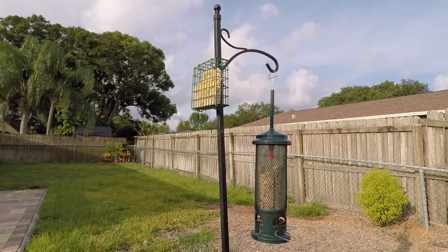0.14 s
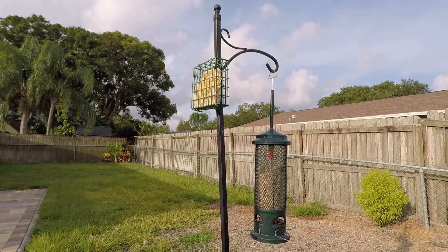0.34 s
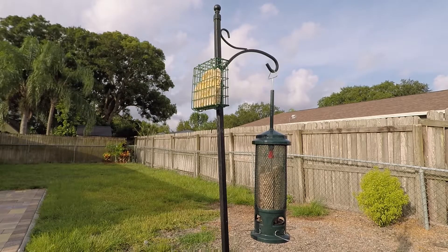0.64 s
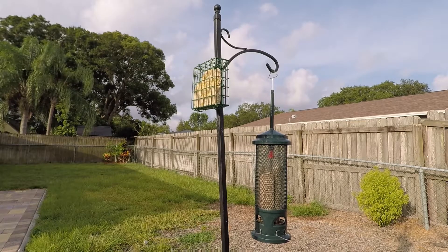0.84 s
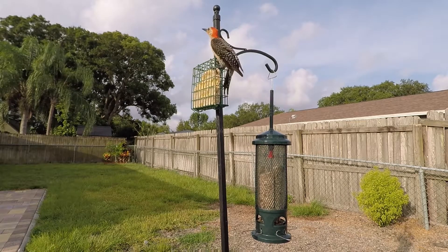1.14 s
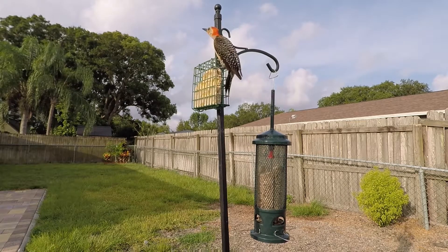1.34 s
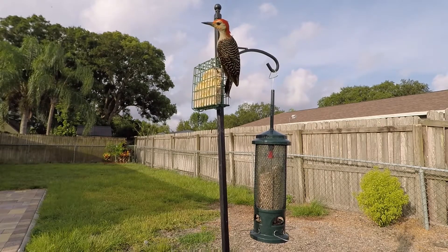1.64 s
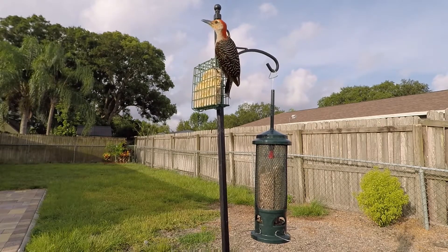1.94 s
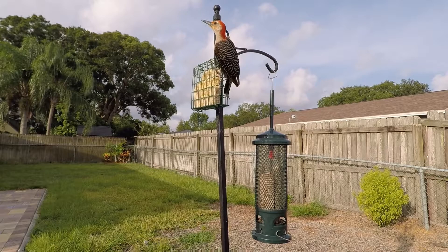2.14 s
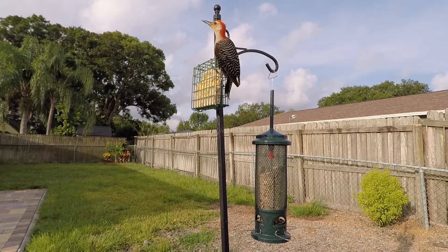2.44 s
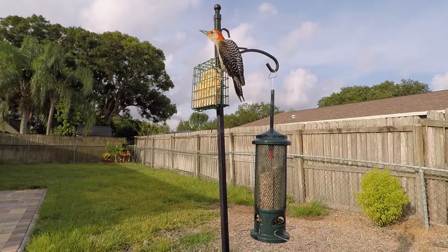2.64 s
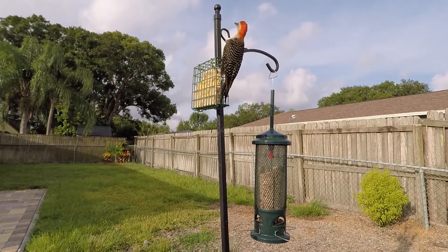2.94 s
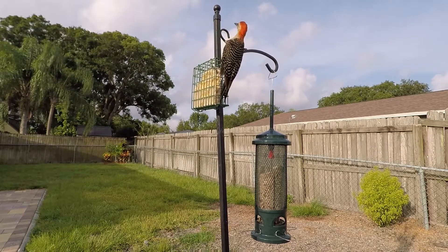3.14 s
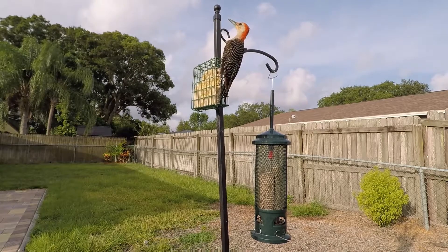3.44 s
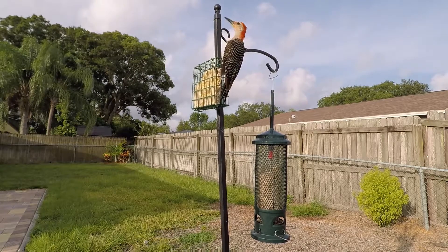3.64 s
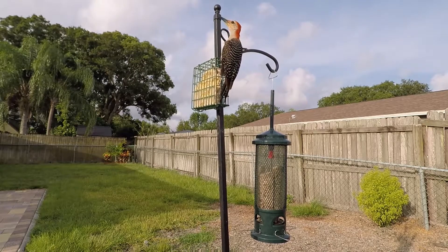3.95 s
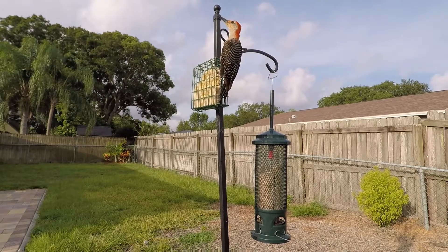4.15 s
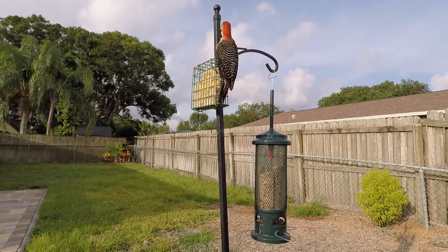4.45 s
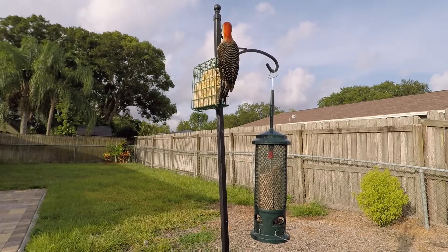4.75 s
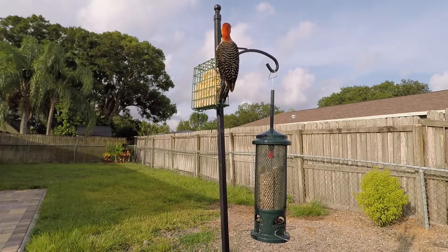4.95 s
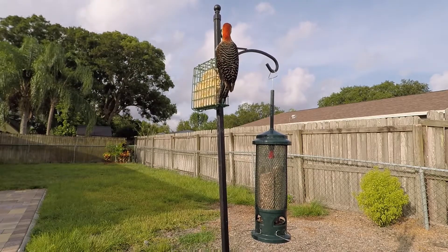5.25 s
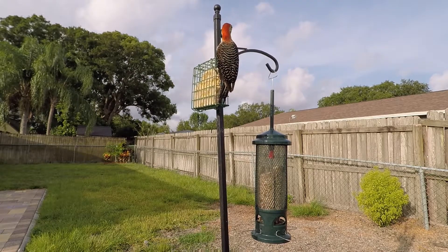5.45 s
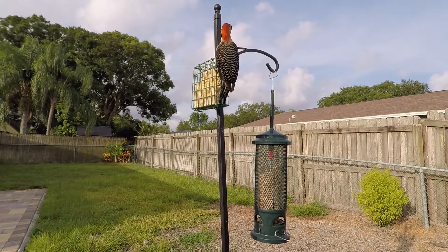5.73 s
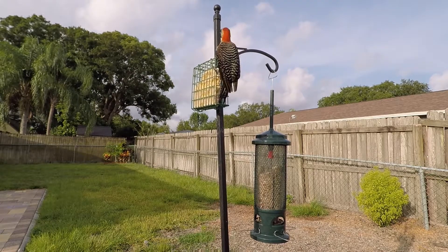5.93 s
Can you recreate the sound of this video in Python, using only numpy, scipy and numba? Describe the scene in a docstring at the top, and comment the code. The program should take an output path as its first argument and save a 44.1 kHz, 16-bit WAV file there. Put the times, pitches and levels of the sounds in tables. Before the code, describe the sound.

A woodpecker flies in with two faint notes and a soft flutter of wings, then lands on an iron feeder pole with a quick, dull knock. It gives five short, harsh calls, pauses, and gives six more, each with a creaky tail and a slight echo off the yard fences. Light wind on the microphone, distant traffic and a soft, steady low thumping lie underneath.

```python
"""A fenced back yard, one camera microphone. A brief low bump, then light wind, distant traffic, a low
drone, a thin pulsing whine and a soft, clock-steady thump from the camera itself. A woodpecker flies in
with two notes on the wing and lands on an iron feeder pole at 0.9 s. It calls five times, a far songbird
chirps, then it calls six times more. Each note is a harsh voiced head and a creaky tail, both made of
syrinx puffs ringing resonances; the fences and the yard echo them."""
import sys
import numpy as np
from scipy import signal
from scipy.io import wavfile
from scipy.ndimage import uniform_filter1d
from numba import njit

SR = 44100
rng = np.random.default_rng(int(sys.argv[2]) if len(sys.argv) > 2 else 0)


def materialize(psi):
    """Save the field psi as 16-bit PCM at rate SR to the path in sys.argv[1].

    A 1-D psi becomes a single channel; in a 2-D psi each row is a channel.
    """
    bounded = np.clip(np.atleast_2d(psi).T, -1, 1)
    quanta = np.round(bounded * 32767).astype(np.int16)
    wavfile.write(sys.argv[1], SR, quanta)


N = 268480

# distant traffic: (frequency [Hz], relative density [dB per Hz])
TRAFFIC_SPECTRUM = [(53, -29), (90, -1), (242, -15), (288, -12.5), (406, -15.5), (515, -19.5), (599, -11.5),
                    (827, -15), (1240, -29), (5990, -35), (7430, -43.5), (8640, -42.5), (15500, -45.5)]
# a brief low bump at the very start, then light wind on the microphone: (time [s], level [dB])
BUMP_AND_WIND = [(0.0, -29.5), (0.08, -45), (0.2, -40), (0.41, -47), (0.46, -43), (0.95, -47.5),
                 (1.76, -46), (2.39, -53), (2.49, -44), (2.74, -54), (2.78, -44), (3.23, -51.5),
                 (3.42, -38.5), (3.5, -52.5), (4.89, -48), (4.93, -49.5), (6.06, -52.5), (6.08, -54)]
# far songbird: (time [s], pitch [Hz], level [dB])
SONGBIRD_CHIRP = [(3.108, 7150, -84), (3.118, 7140, -73), (3.135, 6440, -76), (3.148, 6200, -88)]
# feather rustles: (time [s], level [dB], decay time [s])
WINGBEATS = [(0.717, -61, 0.017), (0.84, -67.5, 0.028), (0.897, -71.5, 0.052), (0.966, -73, .02),
             (1.016, -72, 0.036), (1.072, -69, 0.014), (3.898, -68, 0.0079), (5.427, -66, 0.021)]
# feet on the pole: (time [s], level [dB])
FOOT_KNOCKS = [(.848, -48), (0.908, -35), (0.913, -34), (0.921, -39.5), (.929, -39), (.952, -51)]
# modes of the iron pole: (frequency [Hz], level [dB], time to fall 60 dB [s])
POLE_MODES = [(48, 0.5, 0.077), (313, -4, 0.019), (480, 2, 0.015), (660, -2, 0.021), (865, -14, 0.021)]
# echoes off the fences: (delay [s], level [dB])
FENCE_ECHOES = [(0.043, -20.5), (.118, -28)]
# woodpecker notes: (time [s], level [dB], pitch [Hz], hoarseness [0-1], beat depth [0-1],
# beat period [cycles], throat start [Hz], throat end [Hz], upper resonance [Hz], treble [dB], head [s])
NOTES = [(0.326, -51.5, 1466, .9, 0.8, 2, 4330, 4050, 5900, -8, 0.029),
         (.507, -44, 1536, 0.7, 0.1, 3, 4140, 3820, 6020, -7.5, 0.037),
         (1.402, -38, 1480, 0.56, 0.46, 4, 3950, 3640, 7100, -20.5, 0.035),
         (1.708, -36.5, 1538, 0.63, 0.8, 4, 4160, 2890, 7650, -16.5, 0.033),
         (1.981, -37.5, 1581, 0.7, 0.4, 3, 3870, 2670, 7360, -16, 0.038),
         (2.250, -38, 1613, 0.83, 1, 4, 3470, 2830, 7050, -19, 0.044),
         (2.564, -36.5, 1581, 0.83, 0.73, 4, 3460, 2780, 7640, -15.5, 0.037),
         (4.299, -36, 1702, 0.22, 0.78, 3, 4000, 2700, 6520, -12.5, 0.042),
         (4.61, -37.5, 1654, 0.74, 0.55, 3, 3900, 2570, 7370, -12.5, 0.0439),
         (4.896, -37, 1677, 0.74, 0.4, 4, 3400, 2600, 7500, -12, 0.043),
         (5.192, -37.5, 1672, 0.56, 0.58, 3, 3520, 2440, 7300, -12.5, 0.044),
         (5.502, -37.5, 1703, 0.5, 0.6, 3, 3400, 2570, 6960, -12.5, 0.043),
         (5.828, -37, 1701, 0.55, 0.5, 3, 3670, 2630, 7000, -12, .042)]
# envelope of the voiced head: (time [head lengths], level [dB])
HEAD_SWELL = [(0, -25.5), (.12, -9.5), (.3, -5.5), (.45, -2), (.65, 0), (.85, -3.5), (.95, -8),
              (1.15, -12.5), (1.4, -42)]
# envelope of the creaky tail: (time [creak lengths], level [dB])
CREAK_SWELL = [(.15, -33), (.3, 0.5), (.45, -2.5), (.65, 0), (.9, -4), (1.1, -22)]
# resonances of the bill, the head's top treble, the creak's body and its bright edge:
# (centre [Hz], width [Hz], level [dB])
BILL_BANDS = [(952, 320, -12.5), (2610, 680, -3), (5200, 1960, -12)]
SHEEN_BANDS = [(10530, 1900, -5), (12860, 2000, -14), (11850, 5700, -4.5)]
CREAK_BANDS = [(825, 180, 0.5), (1600, 780, -2.5), (2184, 390, 0)]
EDGE_BANDS = [(4080, 340, -57), (6200, 8000, -19)]

WHISTLE_DB, WHISTLE_AT_HZ, WHISTLE_DB_PER_OCTAVE = -4, 1586, 15  # higher notes whistle more
SHEEN_DB = -10.5  # against the upper resonance
CREAK_DB, CREAK_HEADS = -12.5, 3.2  # against the note's level; length in head lengths


def undb(db):
    """Decibels to gain."""
    return 10 ** (np.asarray(db) / 20)


def level(x, db):
    """Scale to an rms level."""
    return x * undb(db) / np.sqrt(np.mean(x ** 2))


def add(into, x, s):
    """Mix x in from time s."""
    i = int(s * SR)
    into[i:i + len(x)] += x[:len(into) - i]


@njit
def svf(x, g, k):
    """State-variable band-pass; tuning g and damping k hold one value or one per sample."""
    y, band_state, low_state = np.empty(len(x)), 0., 0.
    for i in range(len(x)):
        j = min(i, len(g) - 1)
        v = (band_state + g[j] * (x[i] - low_state)) / (1 + g[j] * (g[j] + k[j]))
        band_state = 2 * v - band_state
        low_state += 2 * g[j] * v
        y[i] = k[j] * v
    return y


def band(x, hz, width):
    """A resonance with gain 1 at a steady or moving centre."""
    hz = np.atleast_1d(hz).astype(float)
    return svf(x, np.tan(np.pi * hz / SR), width / hz)


def steep(x, hz, width):
    """A resonance applied twice, rms 1."""
    return level(band(band(x, hz, width), hz, width), 0)


def bank(x, rows):
    """Steep resonances in parallel."""
    return sum(undb(db) * steep(x, hz, width) for hz, width, db in rows)


def walk(rate):
    """Random levels rate times a second, joined by ramps; spread near 1."""
    step = int(SR / rate)
    points = rng.standard_normal(N // step + 2)
    return 1.3 * np.interp(np.arange(N) / step, np.arange(len(points)), points)


def shape(t, rows):
    """Gain along (time, level [dB]) rows, silent outside."""
    s, db = np.transpose(rows)
    return undb(np.interp(t, s, db, left=-99, right=-99))


def traffic(db=-60):
    """Far traffic fills third-octave bands that swell together and flicker alone."""
    freqs, density = np.transpose(TRAFFIC_SPECTRUM)
    out, swell = 0, walk(.41)
    for hz in 100 * 2 ** np.arange(0, 7.4, 1 / 3):
        band_db = np.interp(np.log(hz), np.log(freqs), density) + 10 * np.log10(hz)
        drift_db = .6 * swell + .8 * walk(6)
        noise = band(band(rng.standard_normal(N), hz, hz / 3), hz, hz / 2)
        out += level(noise, 0) * undb(band_db + drift_db)
    return level(out, db)


def drone():
    """A narrow band of noise wavers low in the background."""
    return level(band(rng.standard_normal(N), hz=107.8, width=13), db=-64)


def whine(hz=8580, pulse_hz=60, db=-84):
    """A thin, wavering high tone pulses at a steady pace."""
    t = np.arange(N) / SR
    pulses = np.exp(np.cos(2 * np.pi * pulse_hz * t)) * undb(1.9 * walk(30))
    tone = np.sin(2 * np.pi * np.cumsum(hz + 40 * walk(60)) / SR)
    return level(pulses * tone, db)


def bump_and_wind(flutter_db=1.5):
    """A brief low bump at the very start, then light wind rumbles on the microphone."""
    s, db = np.transpose(BUMP_AND_WIND)
    rumble = band(band(rng.standard_normal(N), 35.2, 34.6), 41, 46.3)
    rumble_db = np.interp(np.arange(N) / SR, s, db)
    return level(rumble, 0) * undb(rumble_db + flutter_db * walk(8.2))


def camera_thump(start_s=.031, every_s=.1024, push_s=.0022, ring_hz=38, q=.62, push_db=-37):
    """A brief dip at a steady pace, which the camera's input stage answers with a slow swing."""
    push, t = np.zeros(N), np.arange(SR // 20) / SR
    dip = -undb(push_db) * t / push_s * np.exp(1 - t / push_s)
    for s in np.arange(start_s, N / SR, every_s):
        add(push, dip, s)
    w = 2 * np.pi * ring_hz
    highpass = signal.bilinear([1, 0, 0], [1, w / q, w * w], SR)
    return signal.lfilter(*highpass, push)


def songbird():
    """One falling sine chirp, far from the microphone."""
    t = np.arange(N) / SR
    s, hz, db = np.transpose(SONGBIRD_CHIRP)
    phase = np.cumsum(np.interp(t, s, hz)) / SR
    return np.sqrt(2) * shape(t, np.c_[s, db]) * np.sin(2 * np.pi * phase)


def wings(rise_s=.0082):
    """Feathers swish through the air in short strokes."""
    strokes = np.zeros(N)
    for s, db, decay_s in WINGBEATS:
        t = np.arange(int(4 * decay_s * SR)) / SR
        add(strokes, undb(db) * (1 - np.exp(-t / rise_s)) * np.exp(-t / decay_s), s)
    air = rng.standard_normal(N)
    return strokes * (level(band(air, 2700, 1100), 0) + level(band(air, 5300, 4800), 0))


def landing():
    """Feet knock on the iron pole and ring its modes."""
    knocks, t = np.zeros(N), np.arange(SR // 5) / SR
    ring = sum(undb(db) * np.sin(2 * np.pi * hz * t) * 1000 ** (-t / t60) for hz, db, t60 in POLE_MODES)
    ring *= 1 - np.exp(-t / .0017)  # toes are soft
    for s, db in FOOT_KNOCKS:
        add(knocks, -undb(db) * ring, s)
    return knocks


def yard_echo(calls, scatter_db=-13.5, t60_s=.48):
    """Diffuse scatter and fence echoes reach the microphone after the direct sound."""
    t = np.arange(SR // 2) / SR
    scatter = rng.standard_normal(len(t)) * 1000 ** (-t / t60_s)
    response = undb(scatter_db) * scatter * (t > .02) / np.sqrt(np.sum(scatter ** 2))
    for s, db in FENCE_ECHOES:
        # planks and posts smear each echo over a few milliseconds
        smear = rng.standard_normal(132) * np.hanning(132)
        add(response, undb(db) * smear / np.sqrt(np.sum(smear ** 2)), s)
    return band(signal.fftconvolve(calls, response)[:N], 1800, 10000)


def creak(length_s, rate_hz=480):
    """The slack syrinx lets out slow, uneven puffs with some air between them."""
    t = np.arange(int(.17 * SR)) / SR
    gap_jitter, size_jitter = rng.standard_normal((300, 2)).T
    onsets = (np.cumsum(np.exp(.44 * gap_jitter) / rate_hz) * SR).astype(int)
    inside = onsets < len(t)
    clicks = .05 * rng.standard_normal(len(t))
    clicks[onsets[inside]] += undb(2.2 * size_jitter[inside])
    puffs = np.convolve(clicks, np.exp(-(np.arange(-12, 13) / 3) ** 2), "same")
    puffs -= uniform_filter1d(puffs, size=60)  # so small a bird radiates no bass
    body = sum(level(band(puffs, hz, width), db) for hz, width, db in CREAK_BANDS)
    return shape(t / length_s, CREAK_SWELL) * level(body + bank(clicks, EDGE_BANDS), 0)


def syrinx(pitch, hoarse, beat_depth, beat_cycles):
    """One puff a cycle, one in every few stronger; hoarseness adds jitter and breath."""
    phase = np.cumsum(pitch) / SR
    cycle = phase.astype(int)
    size_jitter, time_jitter = rng.standard_normal((200, 2))[cycle].T
    beat = 1 - np.clip(beat_depth, 0, .85) * (cycle % round(beat_cycles) > 0)
    size = beat * undb(3.5 * hoarse * size_jitter)
    late = np.clip(.11 * hoarse * time_jitter, -.3, .3)
    puffs = size * np.exp(-((phase - cycle - .5 - late) / .038) ** 2 / 2)
    return level(puffs - puffs.mean(), 0) + .3 * hoarse * rng.standard_normal(len(pitch))


def voiced_head(hz, hoarse, beat_depth, beat_cycles, from_hz, to_hz, upper_hz, treble_db, head_s):
    """Syrinx puffs ring a throat resonance that sinks as the bill closes."""
    progress = np.arange(int(.07 * SR)) / SR / head_s
    # the pitch climbs to its plateau and sags at the end
    pitch = hz * (1 - .238 * np.exp(-progress / .1205) - .188 * np.clip(progress - .7, 0, 1))
    hoarse = hoarse + .6 * np.exp(-progress / .2)  # unsteady at first, settled by mid-note
    puffs = syrinx(pitch, hoarse, beat_depth, beat_cycles)
    closing = np.clip((progress - .2) / .6, 0, 1)
    throat = steep(puffs, from_hz + (to_hz - from_hz) * closing, 700)
    bill = bank(puffs, BILL_BANDS)
    # whistle and treble need full effort, so they arch over the middle of the note
    slack = ((progress - .55) / .5) ** 2
    whistle_db = WHISTLE_DB + WHISTLE_DB_PER_OCTAVE * np.log2(hz / WHISTLE_AT_HZ)
    whistle = undb(whistle_db - 5 * slack) * steep(puffs, pitch, 680)
    upper = undb(-3 * slack) * steep(puffs, upper_hz * (1 - .091 * closing), 1300)
    sheen = undb(SHEEN_DB - 8 * slack) * bank(puffs, SHEEN_BANDS)
    treble = undb(treble_db) * (upper + sheen)
    return shape(progress, HEAD_SWELL) * (throat + bill + whistle + treble)


def woodpecker():
    """The foreground bird: each voiced head gives way to a creak, and the yard answers."""
    calls = np.zeros(N)
    for s, db, *voice, head_s in NOTES:
        add(calls, undb(db) * voiced_head(*voice, head_s), s)
        add(calls, undb(db + CREAK_DB) * creak(CREAK_HEADS * head_s), s)
    return calls + yard_echo(calls)


def scene():
    """The yard from one microphone position, in mono."""
    bird = woodpecker() + wings() + landing()
    background = songbird() + whine() + bump_and_wind() + traffic() + drone() + camera_thump()
    return (bird + background)[None]


def record(dry, port_db=3.7, top_hz=15600):
    """The microphone port rings in the treble and the camera cuts the top."""
    port_ring = (undb(port_db) - 1) * band(dry[0], hz=5970, width=210)
    lowpass = signal.ellip(10, .2, 60, top_hz, fs=SR, output="sos")
    return signal.sosfilt(lowpass, dry + port_ring)


dry = scene()
out = record(dry)
materialize(out)
```